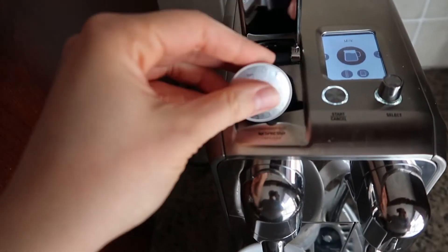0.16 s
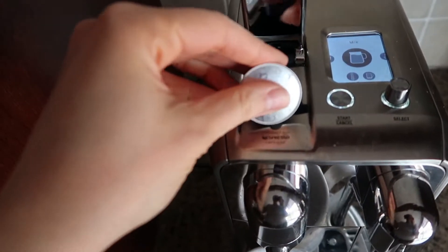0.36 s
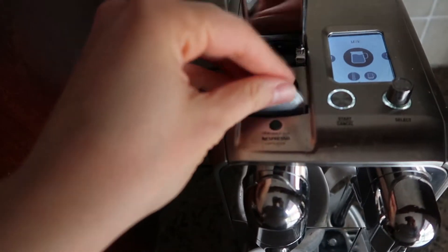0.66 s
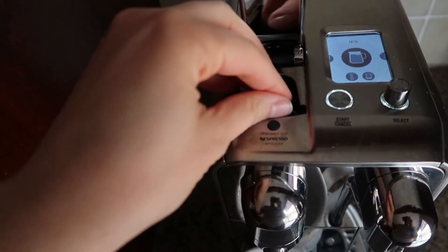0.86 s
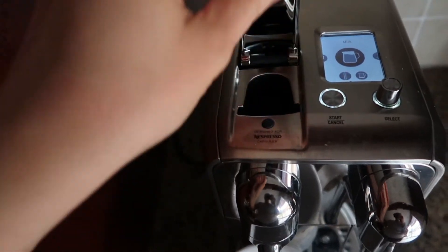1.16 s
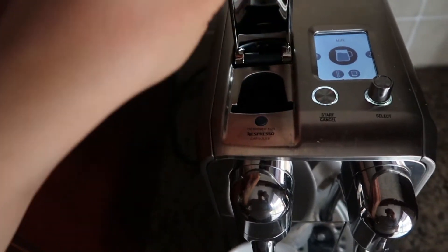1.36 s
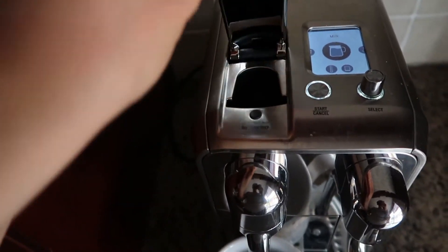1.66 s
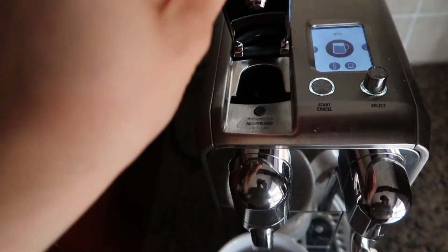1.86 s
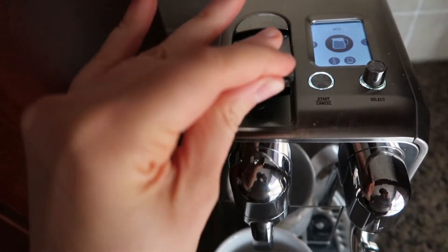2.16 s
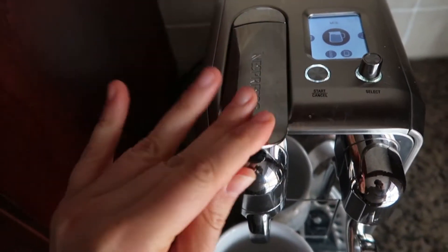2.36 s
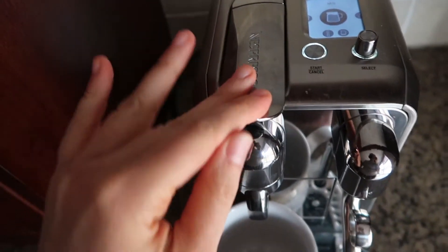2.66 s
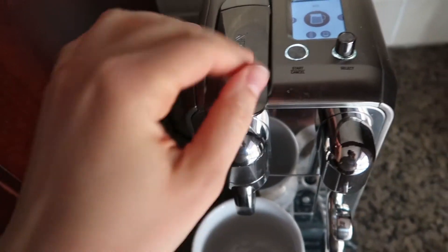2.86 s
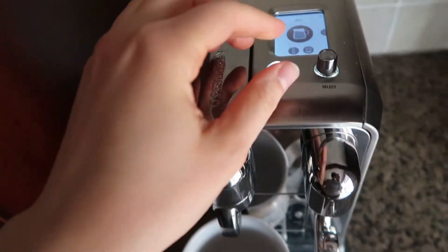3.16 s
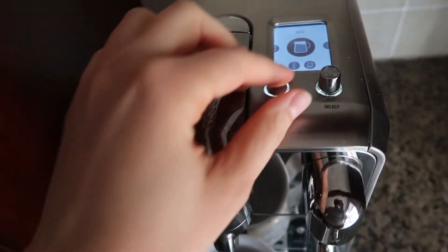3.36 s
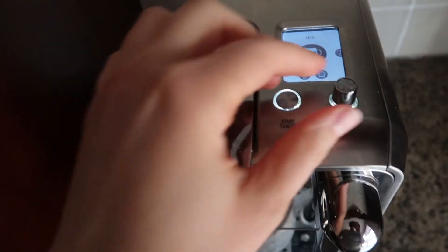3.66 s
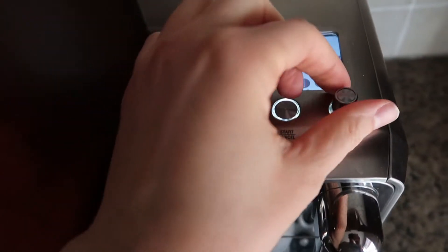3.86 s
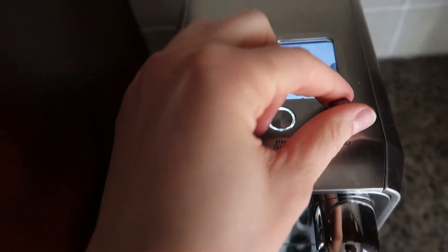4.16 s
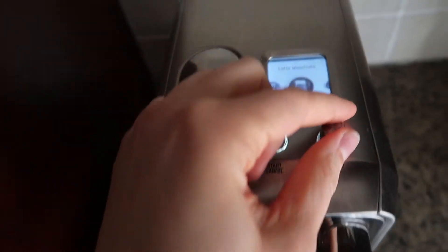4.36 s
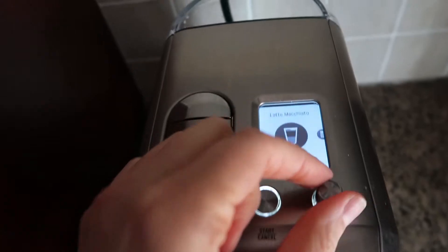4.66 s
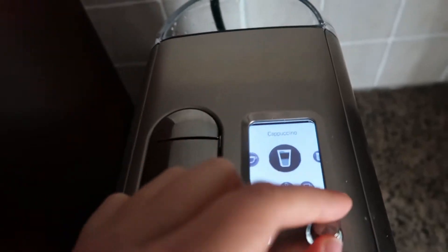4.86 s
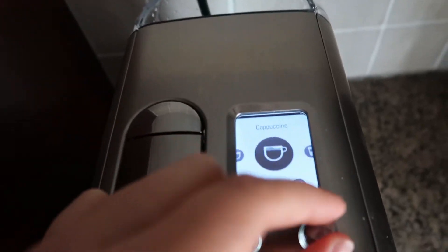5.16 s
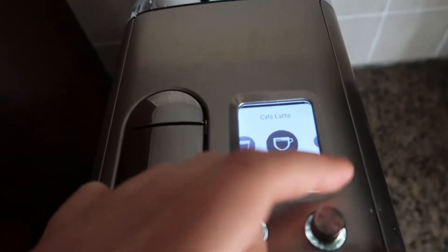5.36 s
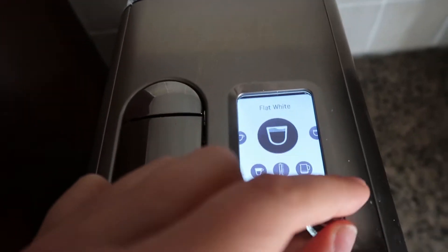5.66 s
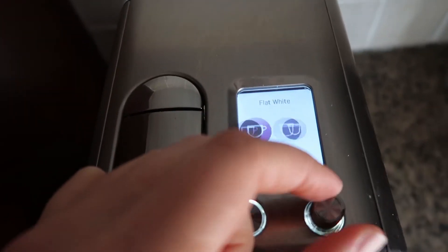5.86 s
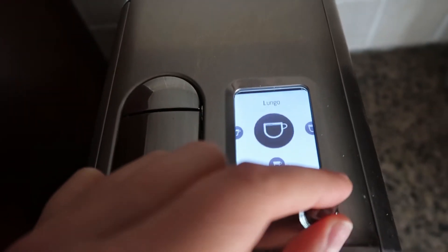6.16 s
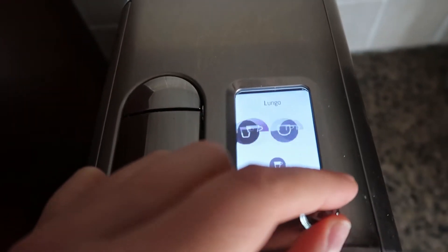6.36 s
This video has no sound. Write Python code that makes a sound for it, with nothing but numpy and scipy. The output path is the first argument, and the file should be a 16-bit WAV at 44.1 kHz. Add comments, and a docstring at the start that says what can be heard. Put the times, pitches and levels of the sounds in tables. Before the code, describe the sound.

Small foil and plastic taps, a lever rattling shut with one hard slam and boom, then faint dial clicks in a quiet hard-walled kitchen.

```python
"""A quiet hard-walled kitchen: a hand fits a foil capsule into a coffee machine, swings the lever shut,
a latch clicks and a detented dial turns. Each contact is a short rattle of clicks that rings the modes of
the part it touches; strokes are resonant grit, booms and steel rings are decaying sines. Echo and room tone
are shaped noise, with wavering appliance hums. Two near microphone ports with gain control hear it all."""
import sys
import numpy as np
from scipy import signal
from scipy.fft import rfft, irfft, next_fast_len
from scipy.io import wavfile
from scipy.ndimage import uniform_filter1d

SR = 44100
rng = np.random.default_rng(int(sys.argv[2]) if len(sys.argv) > 2 else 0)


def undo_db(level):
    """Turn decibels back into plain size, where 20 dB means ten times bigger."""
    steps = np.asarray(level, float) / 20
    return 10 ** steps


def persist_wave(psi):
    """Save psi, clipped to +-1, as 16-bit WAV."""
    counts = np.round(np.clip(psi, -1, 1) * 32767).astype(np.int16)
    wavfile.write(sys.argv[1], SR, np.atleast_2d(counts).T)


N = 287532  # samples

# All source levels are those ahead of the gain control.
# Contact tables share these columns: [t/s, knock/dB, weight/dB, hardness/dB]
#   knock = loudest short rms of 600-2400 Hz; weight = thud below it and hardness = click above it, re knock
# Some add sharpness/dB = tick over 6 kHz re click. Mode tables give the clusters a part rings with.

# The lever's knocks on the housing: [t/s, knock/dB, weight/dB, hardness/dB, rattle length/s]
LEVER_KNOCKS = [(1.565, -39.5, -2, -32, .008), (1.585, -51, -4, -36, .008), (1.609, -56, 17, 4.5, .008),
                (1.656, -46.5, -1.5, -13, .013), (1.677, -41, 1.5, -14.5, .012), (1.728, -37, 4, -28, .008),
                (1.75, -25, -2, -6, .0045), (1.763, -35, 7.5, -3, .007), (1.8, -39, 0, -14, .012),
                (1.88, -60, 22, -14, .008), (2.017, -31.5, -1.5, -6, .012), (2.026, -19.5, 0, -6, .012),
                (2.041, -20.5, 4, -16.5, .009), (2.064, -28, -3, -3.5, .012), (2.088, -32.5, 1.5, -14, .01),
                (2.115, -37.5, 3.5, -12, .01), (2.376, -33, -4, -9, .004),
                (2.3824, -7.5, -1.5, -1.5, .0045), (2.461, -31, 5, -17, .008)]


def evened(x):
    """Scales to rms 1."""
    return x / np.sqrt(np.mean(x ** 2) + 1e-20)


def read(points, hz):
    """Reads a spectrum on a log-frequency axis."""
    f, value = np.transpose(points)
    return np.interp(np.log(hz + 1), np.log(f + 1), value)


def add(mix, s, sound):
    """Mixes a sound in at time s."""
    part = mix[round(s * SR):][:len(sound)]
    part += sound[:len(part)]


def resonate(x, hz, width):
    """One resonance of gain 1."""
    centre = min(hz, SR / 2.2)
    b, a = signal.iirpeak(centre, centre / width, SR)
    return signal.lfilter(b, a, x)


def resonate_twice(x, hz, width):
    """A resonance followed by one twice as wide, for steeper skirts."""
    return resonate(resonate(x, hz, width), hz, 2 * width)


def grit(size, spread_db):
    """Dense clicks of either sign; a few stand out."""
    return rng.standard_normal(size) * undo_db(spread_db * np.minimum(rng.exponential(1, size), 5))


def contacts(rows, clusters, crack_db, attack):
    """A dying rattle of clicks feeds energy into dense clusters of modes, then four bands are levelled.

    attack: how many times the rise fits into the rattle length."""
    crowding = .13  # width of a cluster as a share of its frequency
    out, size = np.zeros(N), SR // 3
    edges = [signal.butter(4, e, "band", fs=SR, output="sos")
             for e in ([70, 600], [600, 2400], [2400, 6000], [6000, 13800])]
    for s, knock_db, weight_db, hard_db, sharp_db, length in rows:
        u = np.arange(size) / SR / max(length, 5e-4)  # time in rattle lengths
        rattle = evened(grit(size, 8.1) * np.minimum(u * attack, 1) * np.exp(-2 * u))
        dense = rng.standard_normal(size)
        # the bare crack of the contact, slightly rounded
        sound = undo_db(crack_db) * signal.lfilter([.5, .5], [1], rattle)
        for hz, mode_db, t60 in clusters:
            energy = signal.lfilter([1], [1, -undo_db(-120 / (t60 * SR))], rattle ** 2)
            modes = resonate_twice(dense, hz, crowding * hz)
            sound += undo_db(mode_db) * evened(modes) * np.sqrt(energy)
        for edge, band_db in zip(edges, [weight_db, 0, hard_db, hard_db + sharp_db]):
            band = signal.sosfilt(edge, sound)
            loudest = np.sqrt(uniform_filter1d(band ** 2, size=200).max())
            add(out, s, undo_db(knock_db + band_db) * band / loudest)
    return out


def with_capsule_length(taps):
    """Gives each tap its rattle length: the sharper the tap, the shorter."""
    return [(*row, .0037 * undo_db(-.15 * row[-1])) for row in taps]  # s, dB of length per dB of sharpness


def rim_taps():
    """The capsule touches the rim of the slot, which rings."""
    # [t/s, knock/dB, weight/dB, hardness/dB, sharpness/dB]
    taps = [(.223, -41.5, -2.5, -3.5, -14), (.554, -24, -37, -7, 7.5), (.626, -47.5, 3, 3.5, -17)]
    # modes of the rim: [f/Hz, level/dB, t60/s]
    rim = [(336, 15.5, 0.15), (1114, -5, 0.17), (2120, 7.5, 0.051), (3120, 0, 0.077), (4200, -4, 0.049),
           (8190, -2.5, 0.014), (9260, -9.5, 0.026)]
    return contacts(with_capsule_length(taps), rim, crack_db=23, attack=25)


def capsule_taps():
    """The foil capsule itself rings under short taps."""
    # [t/s, knock/dB, weight/dB, hardness/dB, sharpness/dB]
    taps = [(.276, -31, -19, -8, -2.5), (.757, -36.5, -14, -2.5, -12), (.776, -24.5, -11.5, -9.5, 8.5),
            (.83, -45.5, 1.5, 2, -27), (.862, -40.5, -0.5, 2, -6.5), (0.889, -45, 0, -1.5, -21),
            (1.042, -37.5, -12, -15, -31), (1.059, -31, 3, 15.5, -17.5), (1.239, -48.5, 7.5, -16, -2)]
    # modes of the capsule: [f/Hz, level/dB, t60/s]
    capsule = [(129.6, -7, .1), (336, 3.5, .11), (720, -19.5, 0.047), (1140, -4.5, 0.12),
               (1584, -6.5, 0.11), (2030, -6.5, 0.07), (2540, -4, 0.039), (3680, 5.5, 0.052),
               (4174, -1, 0.09), (5730, -2.5, 0.015), (7150, 1.5, 0.043), (10000, -1, 0.03)]
    return contacts(with_capsule_length(taps), capsule, crack_db=29, attack=15)


def lever():
    """The lever knocks on the housing, hardest as it slams shut."""
    # modes of the housing: [f/Hz, level/dB, t60/s]
    housing = [(118, -17, 0.4), (165, -2.5, 0.047), (343.4, -1, 0.1), (430, -10.5, 0.22),
               (544, -12.5, 0.15), (1090, -3, 0.081), (1490, -9.5, 0.11), (1995, -5, 0.058),
               (2750, -2.5, 0.013), (3700, -4.5, 0.048), (5190, -10.5, 0.034), (8000, -8, 0.027),
               (11000, -15, 0.019)]
    sharp_db = -11
    rows = [(*row, sharp_db, length) for *row, length in LEVER_KNOCKS]
    return contacts(rows, housing, crack_db=21.5, attack=5.0)


def steel():
    """Faint rings of a thin steel part grow with the square of the blow, so the slam stands far out."""
    # [f/Hz, level/dB, t60/s]
    tones = [(624, 3, 1.1), (1252, -1, 1.3)]
    out, t = np.zeros(N), np.arange(SR) / SR
    ring = sum(undo_db(db - 60 * t / t60) * np.sin(2 * np.pi * hz * t) for hz, db, t60 in tones)
    for s, knock_db, *_ in LEVER_KNOCKS:
        add(out, s, undo_db(-23 + 2 * knock_db) * ring)
    return out


def thumps():
    """The counter booms under the machine: low rings without a crack, rising over one cycle."""
    # [t/s, level at the start of the decay/dB, f/Hz, t60/s]
    booms = [(2.034, -25, 85, .2), (2.383, 1.5, 184.6, 0.082), (2.386, -17, 118, 0.36),
             (2.387, -11.5, 94.3, 0.34), (5.091, -38.5, 87.6, 0.27)]
    out, t = np.zeros(N), np.arange(SR // 2) / SR
    for s, db, hz, t60 in booms:
        add(out, s, undo_db(db - 60 * t / t60) * np.sin(2 * np.pi * hz * t) * np.minimum(t * hz, 1))
    return out


def latch():
    """The latch clicks in short rattles that ring its own modes."""
    # [t/s, knock/dB, weight/dB, hardness/dB]
    clicks = [(2.749, -41, 2.5, 7.2), (2.789, -43, -0.5, 4.5), (2.812, -45.5, -3, 3.8)]
    # modes of the latch: [f/Hz, level/dB, t60/s]
    latch_modes = [(338, -1.5, 0.41), (960, -9.5, 0.11), (2040, -4, 0.052), (2790, -1, 0.039),
                   (3816, -9, 0.049), (5000, -10, 0.046), (7470, -16.5, 0.034)]
    sharp_db, length = -21, .0038  # dB, s
    return contacts([(*row, sharp_db, length) for row in clicks], latch_modes, crack_db=21.5, attack=11)


def dial():
    """The detented dial clicks in longer, duller rattles."""
    # [t/s, knock/dB, weight/dB, hardness/dB]
    clicks = [(4.015, -52, -15.5, 0.5), (4.601, -38, -6, -4.5), (4.699, -48.5, -14, -9.5),
              (4.835, -53.5, 3, -4), (4.905, -47.5, -6.5, -30), (4.986, -41.5, -18, -11.5),
              (5.012, -46, 2, -3), (5.329, -56.5, 2, 4.5), (5.413, -49, 2.5, -1.5),
              (5.524, -45.5, 0, -10.5), (5.831, -43, -9, -17), (5.88, -43, 3, 0), (5.957, -40, -5, 6),
              (5.975, -42.5, -24, -8), (6.186, -50, -21, -27)]
    # modes of the dial: [f/Hz, level/dB, t60/s]
    dial_modes = [(154, -5.5, 0.51), (359, 10, 0.12), (910, -8, 0.081), (1544, -6, 0.083),
                  (2106, -5.5, 0.038), (3094, -7, 0.064), (5000, -18.5, 0.06), (6900, -24, 0.028),
                  (12700, -3, 0.015)]
    sharp_db, length = -24, .011  # dB, s
    return contacts([(*row, sharp_db, length) for row in clicks], dial_modes, crack_db=19, attack=5)


def slides(rows, hz, width):
    """Stick-slip grit through a broad resonance, swelling and fading with each stroke."""
    out = np.zeros(N)
    lowpass = signal.butter(4, 12500, fs=SR, output="sos")
    for start, end, db in rows:
        size = round((end - start) * SR)
        colour = signal.sosfilt(lowpass, resonate_twice(grit(size, 1.4), hz, width))
        add(out, start, undo_db(db) * evened(colour) * np.hanning(size))
    return out


def strokes():
    """Skin, foil, plastic and hinge slide over the machine, each kind with one colour."""
    # all four: [start/s, end/s, rms before the swell is applied/dB]
    skin_brushes = [(.174, .205, -68), (.672, 0.72, -59), (4.696, 4.739, -64.5), (5.54, 5.603, -64.5)]
    foil_scrapes = [(.688, 0.752, -56.5), (.739, .782, -32), (.82, 0.89, -49.5), (.867, 0.92, -39.5),
                    (1.003, 1.055, -44)]
    plastic_rubs = [(.511, 0.62, -44.5), (1.7, 1.804, -36.5), (1.772, 1.96, -57.5), (1.968, 2.107, -41),
                    (2.1, 2.248, -59), (2.29, 2.443, -54.5), (4.504, 4.605, -59.5), (4.622, 4.92, -62),
                    (5.223, 5.357, -58.5), (6.105, 6.265, -62)]
    hinge_drags = [(1.516, 1.65, -42.5), (2.748, 2.994, -55)]
    skin = slides(skin_brushes, hz=9500, width=6500)
    foil = slides(foil_scrapes, hz=3100, width=4500)
    plastic = slides(plastic_rubs, hz=1600, width=2400)
    hinge = slides(hinge_drags, hz=410, width=300)
    return skin + foil + plastic + hinge


def fidgets(count):
    """Fingers shift on the dial at chance moments; each shift is a faint short pitched blip of grit."""
    first, last = 4.62, 5.4  # s
    low, high = 1000, 3000  # Hz
    top_db, swell_s = -56, .008  # level of the loudest blips, time to the peak
    out, t = np.zeros(N), np.arange(SR // 10) / SR
    swell = t / swell_s * np.exp(1 - t / swell_s)
    for when, pitch, softness in rng.random((count, 3)):
        hz = low * (high / low) ** pitch
        blip = evened(resonate_twice(grit(len(t), 3.), hz, .15 * hz))
        add(out, first + when * (last - first), undo_db(top_db - 5.2 * softness) * swell * blip)
    return out


def ports(x, lean):
    """Scattering around the microphone makes the ports differ, mostly in the treble, which leans to one side."""
    # scattered difference of the ports re their sum: [f/Hz, level/dB]
    side_db = [(60, -32), (150, -36), (380, -33.5), (950, -22), (2400, -12.5), (6000, -7), (12000, 1)]
    size = next_fast_len(N + 2048)
    scatter = rng.standard_normal(1024) * np.exp(-np.arange(1024) / 180.)
    hz = np.fft.rfftfreq(size, 1 / SR)
    scattered = rfft(scatter / np.linalg.norm(scatter), size) * undo_db(read(side_db, hz))
    apart = scattered + lean * hz / (hz + 700)
    side = irfft(rfft(x, size) * apart, size)[:N]
    return np.array([x + side, x - side])


def kitchen(x):
    """Diffuse field: the energy of each narrow band arrives late, dies at its own speed and has random phase."""
    # [f/Hz, t60/s]
    decay = [(100, 0.2), (400, 0.61), (1500, 0.7), (2800, 0.53), (4200, 0.5), (5200, 0.26), (8000, 0.18),
             (14000, 0.1)]
    hz, _, z = signal.stft(x, SR, nperseg=512, noverlap=384)
    octaves = np.log2(hz + 40)
    blur = np.exp(-((octaves[:, None] - octaves) / .11) ** 2)
    power = blur @ abs(z) ** 2 / blur.sum(1)[:, None]
    keep = undo_db(-120 * 128 / SR / read(decay, hz))  # energy kept from frame to frame
    # three frames late
    field = np.array([signal.lfilter([0, 0, 0, 1 - k], [1, -k], p) for k, p in zip(keep, power)])
    a, b, c, d = rng.standard_normal((z.shape[1], len(hz), 4)).T
    mid = a + 1j * b
    side = (c + 1j * d) * hz[:, None] / (hz[:, None] + 5000)  # the bass is alike in both ports
    spectra = np.sqrt(field) * np.array([mid + side, mid - side])
    return signal.istft(spectra, SR, nperseg=512, noverlap=384)[1][:, :N]


def hums():
    """Wavering appliance tones: noise through narrow resonances."""
    # [f/Hz, width/Hz, rms/dB]
    tones = [(43, 3, -63), (125.8, 11, -58)]
    noise = rng.standard_normal(N)
    return sum(undo_db(db) * evened(resonate_twice(noise, hz, width)) for hz, width, db in tones)


def room_tone():
    """Random short-time spectra with drifting patches and a wandering bass."""
    # spectrum, relative: [f/Hz, level per Hz/dB]
    air_spectrum = [(15, -36), (25, -8.5), (48, -1.5), (86, -9.5), (122, -1.5), (148, -9.5), (289, -7),
                    (421, -10), (523, -14.5), (648, -17), (1530, -21), (1750, -21), (5730, -30),
                    (13900, -45.5), (15500, -62.5)]
    # drift of the bass, relative: [t/s, level/dB]
    rumble = [(0, -4.5), (1, 2.5), (1.5, -1.5), (2.9, 2), (3.049, -3.5), (3.6, -1), (4.3, -2.5), (5, 0),
              (6.52, -1.5)]
    # left-right likeness: [f/Hz, correlation from -1 to 1]
    likeness = [(60, 1), (180, 0.76), (550, 0.39), (1650, -0.13), (4970, -0.25), (15000, -0.21)]
    frames, hz = N // 512 + 5, np.fft.rfftfreq(2048, 1 / SR)
    a, b, c, d, patches = rng.standard_normal((frames, 1025, 5)).T
    patches = uniform_filter1d(patches, size=12, axis=0)
    patches = evened(uniform_filter1d(patches, size=8, axis=1))
    drift_db = np.interp(np.arange(frames) * 512 / SR, *np.transpose(rumble))
    bass = 1 / (1 + (hz[:, None] / 600) ** 2)
    same = np.clip(read(likeness, hz), -1, 1)[:, None]
    left = a + 1j * b
    right = same * left + np.sqrt(1 - same ** 2) * (c + 1j * d)
    level_db = read(air_spectrum, hz)[:, None] + bass * (drift_db + 0.65 * patches) + .5 * patches
    z = np.array([left, right]) * undo_db(level_db)
    return undo_db(-49.5) * evened(signal.istft(z, nperseg=2048, noverlap=1536)[1][:, :N])


def scene():
    """Capsule, lever, latch, dial and slides close by, their echo, and the room tone with its hums."""
    near = rim_taps() + capsule_taps() + lever() + thumps() + latch() + dial()
    near += strokes() + fidgets(count=16)
    close = ports(near, lean=-.05) + steel()
    return close + undo_db(-11.5) * kitchen(near) + room_tone() + hums()


def roll_off(x):
    """The treble ends steeply here."""
    return signal.sosfilt(signal.butter(12, 16510, fs=SR, output="sos"), x)


def record(dry):
    """Gain control turns down after loud knocks and creeps back; then the peaks clip."""
    threshold_db, share = -20, 0.48  # share of the excess that is taken off
    power_db = 10 * np.log10(abs(uniform_filter1d((dry ** 2).mean(0), size=400)) + 1e-12)
    fall = np.arange(N) * 17.0 / SR  # the held level falls by 17 dB a second
    held_db = np.maximum.accumulate(power_db + fall) - fall
    over_db = np.maximum(held_db - threshold_db, 0)
    late_db = signal.lfilter([.003], [1, -.997], over_db)  # the gain reacts late
    mix = np.clip(dry / undo_db(share * late_db), -1, 1)
    return roll_off(mix)


dry = scene()
out = record(dry)
persist_wave(out)
```